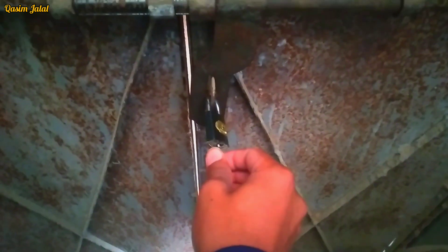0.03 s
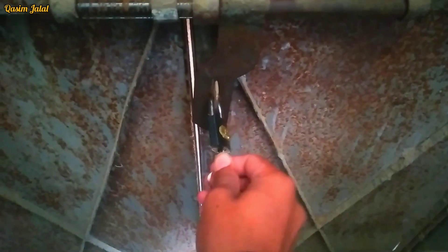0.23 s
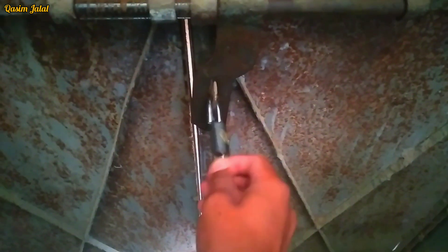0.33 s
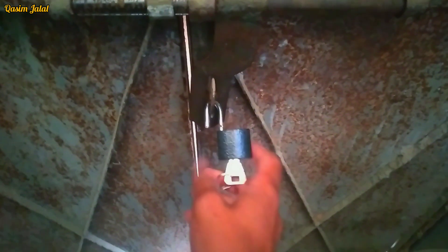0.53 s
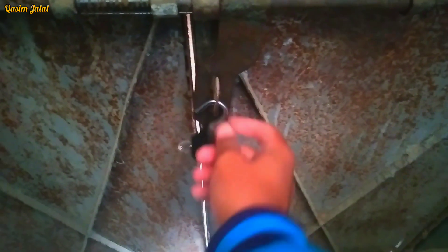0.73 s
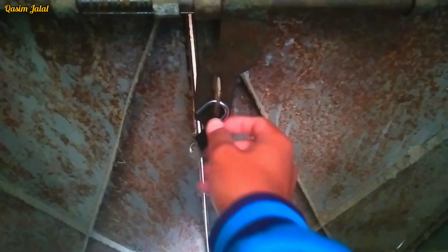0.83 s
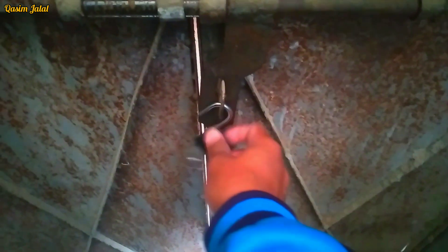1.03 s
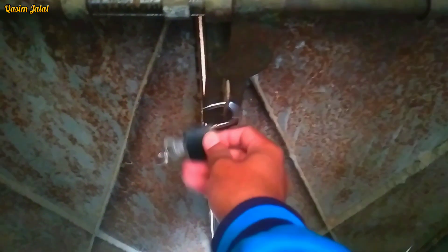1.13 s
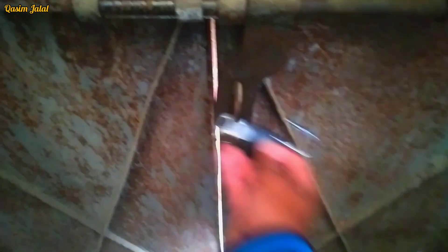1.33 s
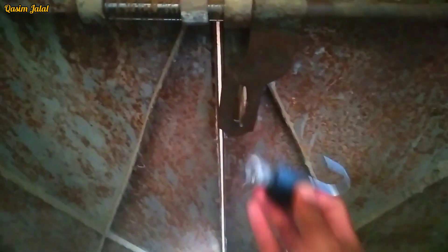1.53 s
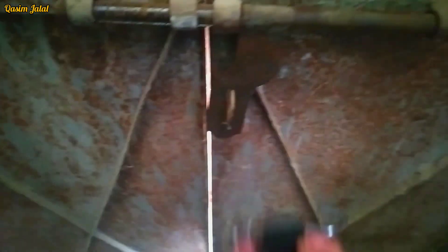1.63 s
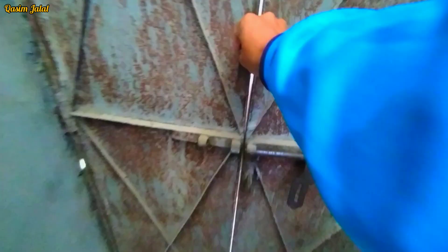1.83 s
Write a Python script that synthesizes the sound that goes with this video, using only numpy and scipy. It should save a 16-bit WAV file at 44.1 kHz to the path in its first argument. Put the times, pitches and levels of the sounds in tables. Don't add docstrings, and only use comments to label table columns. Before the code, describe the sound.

Metal door rattles and bangs as a hand works a padlock loose, heard very close

```python
import sys
import numpy as np
from scipy import signal
from scipy.io import wavfile
from scipy.ndimage import uniform_filter1d

SR = 44100
rng = np.random.default_rng(int(sys.argv[2]) if len(sys.argv) > 2 else 0)


def bounce(signal):
    frames = np.transpose(np.atleast_2d(signal))
    limited = np.clip(frames, -1, 1)
    pcm = np.round(limited * 32767).astype(np.int16)
    wavfile.write(sys.argv[1], SR, pcm)


def how_loud(loudness_db):
    steps = np.asarray(loudness_db, float) / 20
    return 10 ** steps


N = 83790

# time [s], peak [dB], boom [dB], brightness [dB], pan [dB].
KNOCK_ROWS = [(0.0453, -47.5, 11, -25.5, 9.5), (0.218, -38.5, 5, -12.5, 8), (0.226, -36, 9, -14, 4.5),
              (0.3194, -38, 2, -23.5, -3.5), (0.344, -54.5, 4, -2.5, -4), (0.362, -63, 0, -4, -0.5),
              (0.5049, -43.5, 7.5, -26.5, 6.5), (0.562, -30, -2.5, -4, 5), (0.5978, -13, 4, -13, 10.5),
              (0.633, -24.5, 12.5, -20, 1), (0.6791, -18, 8, -10.5, 6.5), (0.9023, -30, 9, -22.5, 6),
              (1.0634, -52.5, 6.5, -14, 6), (1.079, -35, 3.5, -21, 8), (1.118, -25, 11.5, -26, 2.5),
              (1.1508, -30, 14.5, -20, 13.5), (1.1762, -20, 0.5, -19.5, 5), (1.2221, -34, 18.5, 2.5, 3),
              (1.6687, -59, -1, -13, 0.5)]
# pitch [Hz], left minus right [dB].
PORT_TILT = [(60, 1), (700, -0.5), (1290, 0.5), (2380, 6.5), (5000, 7.5), (7500, 13.5), (9500, -15),
             (15000, -1)]
TREBLE_TOP_HZ = 15700


def at_hz(points, hz):
    p = np.array(points, float)
    return np.interp(np.log(hz), np.log(np.maximum(p[:, 0], 1)), p[:, 1])


def rms_one(x):
    return x / np.sqrt(np.mean(x ** 2) + 1e-20)


def drift(rate_per_s):
    r = np.exp(-80 * np.pi * rate_per_s / SR)
    noise = rng.standard_normal(N // 40 + 2002)
    slow = signal.lfilter([1], [1, -2 * r, r * r], noise)[2000:]
    return np.interp(np.arange(N) / 40, np.arange(len(slow)), rms_one(slow))


def resonate(x, hz, width_hz):
    r = np.exp(-np.pi * width_hz / SR)
    zeros = (1 - r * r) / 2 * np.array([1, 0, -1])
    poles = [1, -2 * r * np.cos(2 * np.pi * hz / SR), r * r]
    return signal.lfilter(zeros, poles, x + 1e-18)


def dying(x, t60_s):
    return signal.lfilter([1], [1, -how_loud(-60 / (t60_s * SR))], x + 1e-18)


def low_pass(x, hz):
    return signal.sosfilt(signal.butter(4, hz, fs=SR, output="sos"), x)


def stereo(pair, hz):
    # pitch in Hz, left-right likeness (-1 to 1).
    port_likeness = [(30, 1), (200, 0.93), (600, 0.62), (1200, -0.037), (3000, -0.037), (12000, 0.4)]
    side = np.array([[1], [-1]])
    alike = np.clip(at_hz(port_likeness, hz), -1, 1)
    tilt_db = at_hz(PORT_TILT, hz) / 2
    return how_loud(tilt_db * side) * (np.sqrt(1 + alike) * pair[0] + np.sqrt(1 - alike) * pair[1] * side)


def bands():
    edges_hz = 20 * 2 ** np.arange(0, 9.8, 1 / 3)
    white = rng.standard_normal((2, 2, N))
    for k, (low_hz, high_hz) in enumerate(zip(edges_hz, edges_hz[1:])):
        hz = np.sqrt(low_hz * high_hz)
        band = signal.butter(3, [low_hz, high_hz], "band", fs=SR, output="sos")
        yield hz, stereo(signal.sosfilt(band, white[k % 2]), hz)


def clicks(heights):
    s, pan_db = np.array(KNOCK_ROWS)[:, [0, 4]].T
    out = np.zeros((2, N))
    out[:, (s * SR).astype(int)] = heights * how_loud(np.outer([.5, -.5], pan_db - pan_db.mean()))
    return out


def knock_db(hz):
    # time in s, dull above Hz, loss in dB per octave.
    soft_contacts = [(.562, 10800, -59), (.218, 7000, -12), (1.063, 3500, -20), (1, 10000, -18),
                     (1.12, 7600, -18), (1.15, 4900, -13.5), (1.177, 7500, -27.5), (.903, 6200, -19.5),
                     (0.58, 7700, -25), (.598, 12000, -25), (.678, 11000, -30), (1.223, 12500, -25)]
    boom_hz, mid_hz, bright_hz = 480, 2010, 5000
    s, db, boom_db, bright_db, _ = np.transpose(KNOCK_ROWS)
    low = at_hz([(boom_hz, 1), (mid_hz, 0)], hz)
    high = at_hz([(mid_hz, 0), (bright_hz, 1)], hz)
    dull_db = 0
    for when_s, above_hz, loss_db in soft_contacts:
        dull_db = dull_db + (np.abs(s - when_s) < .006) * loss_db * max(np.log2(hz / above_hz), 0)
    return db + low * boom_db + high * bright_db + dull_db


def panel(pull_db, rub_db):
    # pitch in Hz, width in Hz, level in dB.
    panel_modes = [(26.35, 7.9, -2.5), (52, 6.5, 2.5), (96.1, 10, 2.5), (181.3, 13, -1.5),
                   (307.9, 6.1, -6.5), (393, 12, -13), (434, 49, -18.5), (458.4, 14, -11.5),
                   (545.7, 7.3, -12.5), (612.9, 4.8, -12.5), (851, 59, -14), (1022, 30, -17)]
    broad_mode = (59.6, 134, -2.5)
    panel_db, top_hz = -0.5, 890
    lumps_db, lumps_per_s = 3, 11.8
    upper_hz, upper_follows = 450, 0.6
    out = 0
    for hz, width_hz, db in [*panel_modes, broad_mode]:
        force = rng.standard_normal((2, N)) * how_loud(lumps_db * drift(lumps_per_s))
        follow_db = (hz > upper_hz) * upper_follows * (rub_db - rub_db.mean())
        out = out + how_loud(db + follow_db) * rms_one(stereo(resonate(force, hz, width_hz), hz))
    return how_loud(panel_db + pull_db) * rms_one(low_pass(out, top_hz))


def sheet_and_rub(rub_db):
    # pitch in Hz, level in dB per Hz.
    rub_spectrum = [(200, -9), (400, -8.5), (850, 11), (1300, 1.5), (2500, -4), (3300, -16.5), (4800, -16),
                    (6500, -17.5), (8500, -26)]
    # pitch in Hz, level in dB per Hz.
    sheet_spectrum = [(200, -7), (450, -7), (900, -6.5), (1900, -8), (2800, -4.5), (4000, -4), (6500, -2),
                      (15000, -21)]
    # pitch in Hz, t60 in s.
    sheet_t60 = [(200, 1), (700, 0.24), (1900, 0.32), (4800, 0.16), (8000, .14), (13000, 0.17)]
    rub_gain_db, rub_top_db_per_octave, rub_patchy_db, patches_per_s = 1.5, -9, 3.0, 7.8
    sheet_db, rise_cycles = -10, 2.0
    early_share_t60, late_db, crack_db, crack_t60_s = 1, -0.5, 6, .025
    ring, rub = 0, 0
    for hz, noise in bands():
        top_octaves = max(np.log2(hz / rub_spectrum[-1][0]), 0)
        band_db = at_hz(rub_spectrum, hz) + rub_top_db_per_octave * top_octaves
        rub = rub + (hz > 150) * noise * how_loud(band_db + rub_patchy_db * drift(patches_per_s))
        if hz > 120:
            hit = clicks(how_loud(2 * (knock_db(hz) + at_hz(sheet_spectrum, hz))))
            t60_s = at_hz(sheet_t60, hz) * .5
            early = dying(hit, t60_s * early_share_t60)
            late = how_loud(2 * late_db) * dying(hit, t60_s)
            crack = how_loud(2 * crack_db) * dying(hit, crack_t60_s * .5)
            r = np.exp(-hz / rise_cycles / SR)
            power = signal.lfilter([1 - r], [1, -r], early + late + crack)
            ring = ring + noise * np.sqrt(np.abs(power) * SR / 4000)
    return how_loud(sheet_db) * ring + how_loud(rub_gain_db + rub_db) * rms_one(rub)


def pins():
    # time in s, peak in dB.
    pin_ticks = [
        (.025, -74),
        (.036, -71),
        (.048, -74),
        (.079, -63),
        (.086, -70),
        (.118, -67),
        (.148, -72),
        (.352, -49.5),
        (1.5875, -54.5),
        (1.6975, -38.5),
    ]
    click, (s, db) = np.zeros(N), np.transpose(pin_ticks)
    click[(s * SR).astype(int)] = how_loud(db)
    return signal.sosfilt(signal.butter(2, [1400, TREBLE_TOP_HZ], "band", fs=SR, output="sos"), click)


def held(start_s, hold_s, db, hz, t60_s, wobble_db, wobbles_per_s):
    rise_cycles = 3.0
    t = np.arange(N) / SR - start_s
    shape_db = db - 60 * np.maximum(t - hold_s, 0) / t60_s + wobble_db * drift(wobbles_per_s)
    phase = 2 * np.pi * hz * t + wobble_db / 6 * drift(wobbles_per_s)
    pair = np.sqrt(2) * np.array([np.sin(phase), np.cos(phase)])
    return np.clip(t * hz / rise_cycles, 0, 1) * how_loud(shape_db) * stereo(pair, hz)


def drags():
    # start in s, hold in s, level in dB, pitch in Hz, release t60 in s.
    shoves = [(1.145, 0.115, -30.5, 393, 0.27), (0.28, 0.11, -46.5, 393, 0.46),
              (0.37, 0.081, -40.5, 69, 0.17), (.04, 0.43, -46, 180, .3), (.61, .06, -38, 186, 0.57),
              (0.69, 0.11, -31, 37.5, 0.36), (1.5, 0.065, -38, 67, 0.63), (0.27, .04, -34.5, 35, .4),
              (.05, 0.12, -48.5, 110, .3), (1.3, 0.2, -44, 425, 0.6), (1.2, 0.045, -39, 533, 0.32),
              (1.56, 0.16, -41.5, 54, .9), (0.75, 0.1, -36, 97, 0.48), (0.59, 0.037, -37, 305, .3),
              (1.09, 0.17, -41.5, 470, .3), (.24, 0.18, -52, 830, 0.26), (.9, 0.067, -41.5, 186, .4),
              (1.45, 0.19, -49, 305, .4), (.9, 0.026, -48.5, 830, 0.41), (.6, 0.095, -36.5, 390, 0.32),
              (1.28, 0.063, -45, 620, .2), (1.57, 0.049, -49.5, 110, 0.55)]
    # start in s, hold in s, level in dB, pitch in Hz,
    # release t60 in s.
    chatters = [(.044, 0.065, -75, 5448, 0.44), (.32, 0.01, -65.5, 9070, 0.12), (.32, .015, -70, 12050, .1),
                (.32, 0.046, -77, 6400, .4), (.562, 0.014, -42.5, 5453, 0.11),
                (.562, 0.02, -50, 4650, 0.15), (.562, 0.0088, -50, 10170, .06),
                (.562, 0.012, -45.5, 2760, .2), (.562, 0.026, -49.5, 2394, .3),
                (.562, 0.015, -44.5, 7070, .1), (.598, 0.0058, -34.5, 6562, 0.083),
                (.679, .008, -40, 6562, 0.09), (.218, 0.009, -57.5, 4220, 0.24),
                (.218, 0.034, -61, 3730, .3), (.679, 0.22, -79.5, 12050, 0.22),
                (.903, 0.042, -49.5, 2467, 0.19), (.598, .02, -40.5, 2896, .15),
                (1.08, 0.017, -60.5, 6500, .12), (1.12, 0.022, -44, 2620, .12),
                (1.12, 0.072, -53.5, 3580, .16), (1.15, 0.026, -49.5, 2800, .15),
                (1.177, 0.023, -45.5, 2069, .15), (1.177, 0.019, -47, 4590, 0.14),
                (1.177, 0.0082, -50, 7280, 0.05), (1.223, 0.0072, -51, 7860, 0.15),
                (1.223, 0.0051, -47.5, 9706, .1), (1.223, 0.016, -45.5, 3720, .15),
                (1.668, 0.032, -71, 6420, 0.11), (1.668, .04, -73.5, 9020, .1)]
    knock_s = np.array(KNOCK_ROWS)[:, 0]
    out = 0
    for row in shoves:
        out = out + held(*row, wobble_db=1.6, wobbles_per_s=22)
    for s, *row in chatters:
        nearest_s = knock_s[np.abs(knock_s - s).argmin()]
        out = out + held(nearest_s, *row, wobble_db=2.5, wobbles_per_s=90)
    return out


def lock():
    # pitch in Hz, level in dB, t60 in s.
    steel_modes = [(1495, -2, .25), (1656, -10, 0.23), (1870, -5, 0.3), (1960, -10, 0.3), (2096, -5, 0.3),
                   (2262, -8.5, 0.2), (3060, -9.5, 0.22), (3500, -8, 0.13), (4720, -9.5, .16),
                   (5448, -5.5, 0.15), (6750, -8, 0.1), (7200, -9, .17), (7900, -13, .12),
                   (9100, -10.5, .3), (9706, -16.5, .1), (10360, -13.5, .2), (10800, -16.5, .4),
                   (11400, -18, .3), (12050, -15.5, 0.65), (13200, -20, .3), (14200, -21, .4),
                   (15500, -23, .3)]
    lock_db, spread_db, port_delay_samples = -12, 3, 13
    out, luck = 0, rng.standard_normal((len(KNOCK_ROWS), len(steel_modes)))
    for k, (hz, db, t60_s) in enumerate(steel_modes):
        r, w = how_loud(-60 / (t60_s * SR)), 2 * np.pi * hz / SR
        hit = clicks(how_loud(knock_db(hz) + db + spread_db * luck[:, k]))
        mode = signal.lfilter([0, np.sin(w)], [1, -2 * r * np.cos(w), r * r], hit + 1e-18)
        mode[1] = np.roll(mode[1], port_delay_samples)
        out = out + mode * how_loud(at_hz(PORT_TILT, hz) * np.array([[.5], [-.5]]))
    return how_loud(lock_db) * out


def tick():
    start_s, peak_db, top_hz = 1.5868, -23.5, 2200
    click = np.zeros(N)
    click[int(start_s * SR)] = 1
    pulse = resonate(click, hz=800, width_hz=2400)
    pulse = low_pass(low_pass(pulse, top_hz), top_hz)
    return how_loud(peak_db) * pulse / np.abs(pulse).max()


def scene():
    # time in s, level in dB.
    hand_pull = [(.02, -45.5), (.084, -41.5), (.36, -32), (.434, -39), (.568, -32), (.62, -26), (.792, -27),
                 (.88, -30.5), (.95, -30), (1.034, -31.5), (1.2, -27.5), (1.406, -31.5), (1.69, -39.5)]
    # time in s, level in dB.
    rust_rubbing = [(.02, -55), (.116, -51), (0.221, -49), (0.399, -49.5), (0.479, -60.5), (0.579, -43),
                    (.726, -37.5), (.958, -53.5), (1.222, -40.5), (1.401, -53.5), (1.554, -58.5),
                    (1.69, -61)]
    t = np.arange(N) / SR
    pull_db = np.interp(t, *np.transpose(hand_pull))
    rub_db = np.interp(t, *np.transpose(rust_rubbing))
    return panel(pull_db, rub_db) + sheet_and_rub(rub_db) + drags() + lock() + tick()


def patchy(x):
    from_hz, share, drop_db, above_db = 8400, .6, -24, -36
    hz, t, z = signal.stft(x, SR, nperseg=512)
    luck = rng.random((65, len(t) // 9 + 1)).repeat(4, 0).repeat(9, 1)[:len(hz), :len(t)]
    cells = (np.abs(z) ** 2).sum(0)
    power = cells[hz > from_hz].sum(0)
    attack = power > 5 * np.roll(power, 2)
    held_on = uniform_filter1d(cells, size=5, axis=1)
    line = held_on > 2.2 * uniform_filter1d(held_on, size=11, axis=0)
    loud = power > power.max() * how_loud(2 * above_db)
    dropped = (luck < share) & (hz[:, None] > from_hz) & ~attack & ~line & loud
    gain = np.where(dropped, how_loud(drop_db), 1) * (hz[:, None] < TREBLE_TOP_HZ)
    return signal.istft(z * gain, SR, nperseg=512)[1][:, :N]


def gate(spans, shut_db, size):
    t = np.arange(N) / SR
    is_open = sum((t > open_s) & (t < close_s) for open_s, close_s in spans) * 1.
    return np.maximum(uniform_filter1d(is_open, size=size), how_loud(shut_db))


def top_cut(x):
    return signal.sosfilt(signal.butter(12, 16290, fs=SR, output="sos"), x)


def record(dry):
    # open in s, close in s.
    lower_spans = [
        (0, .40),
        (.50, 1.40),
        (1.584, 1.622),
        (1.662, 1.72),
    ]
    # open in s, close in s.
    upper_spans = [
        (0, .40),
        (.505, .89),
        (.90, .987),
        (1.062, 1.398),
        (1.584, 1.622),
        (1.662, 1.72),
    ]
    start_s, fade_in_s, stop_s = .016, .035, 1.698
    treble_db, offset = -6, -0.002
    t = np.arange(N) / SR
    low = signal.sosfiltfilt(signal.butter(8, 2750, fs=SR, output="sos"), dry)
    lower = signal.sosfiltfilt(signal.butter(6, 3990, fs=SR, output="sos"), dry)
    lower_treble = (lower - low) * gate(lower_spans, shut_db=-18.5, size=1500)
    upper_treble = patchy(dry - lower) * gate(upper_spans, shut_db=-16, size=200)
    x = low + how_loud(treble_db) * (lower_treble + upper_treble) + pins() + offset
    fade = np.clip((t - start_s) / fade_in_s + 0.6, 0, 1) * np.clip((t - start_s) * 700, 0, 1)
    return top_cut(x * fade * (t < stop_s))


dry = scene()
out = record(dry)
bounce(out)
```